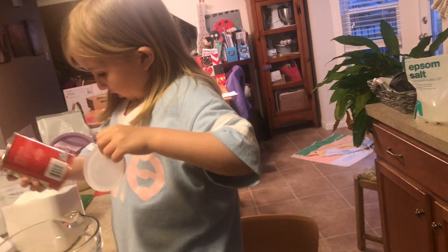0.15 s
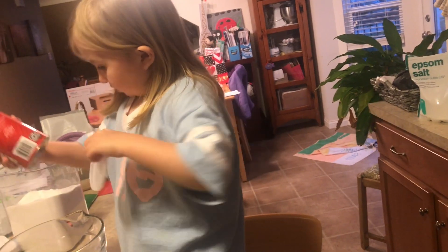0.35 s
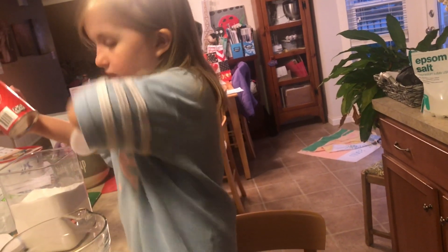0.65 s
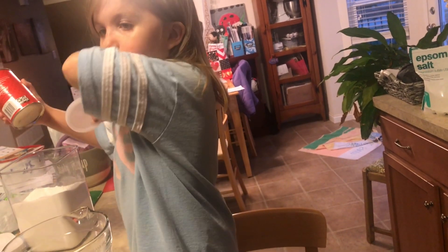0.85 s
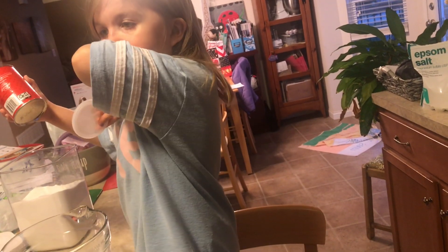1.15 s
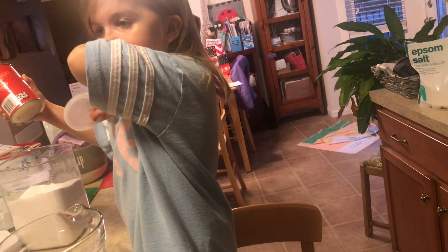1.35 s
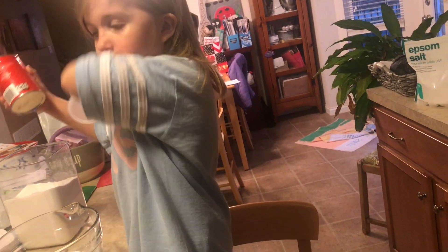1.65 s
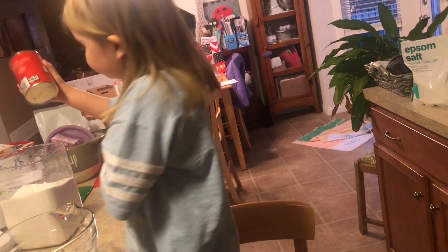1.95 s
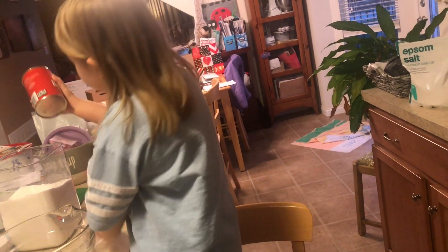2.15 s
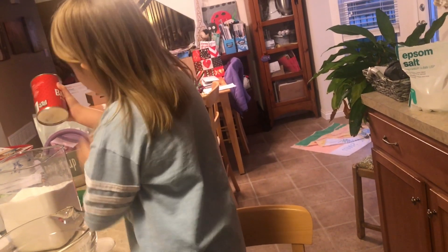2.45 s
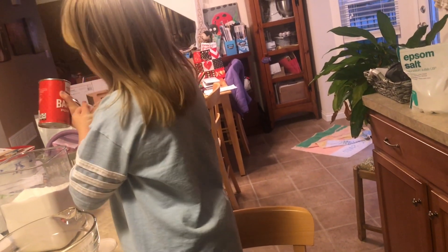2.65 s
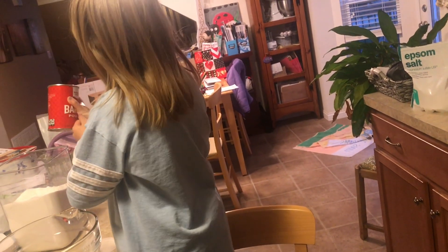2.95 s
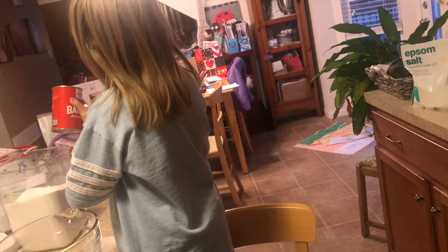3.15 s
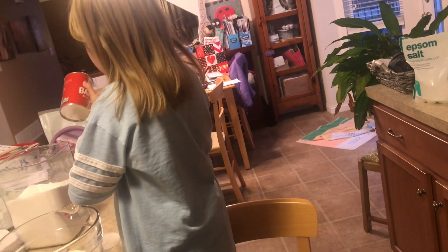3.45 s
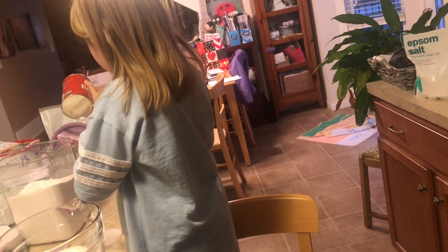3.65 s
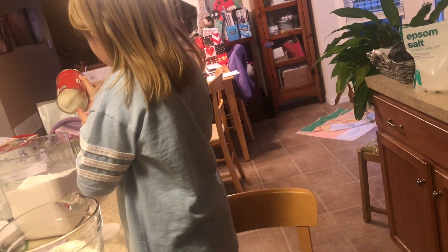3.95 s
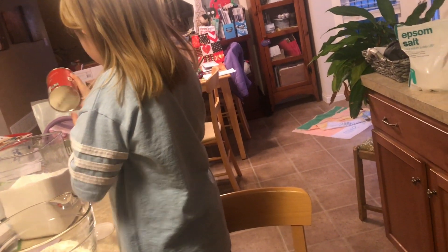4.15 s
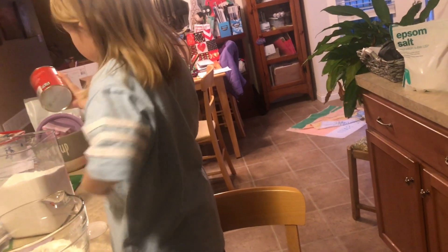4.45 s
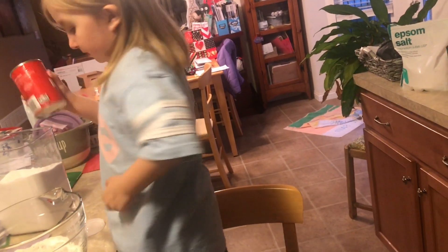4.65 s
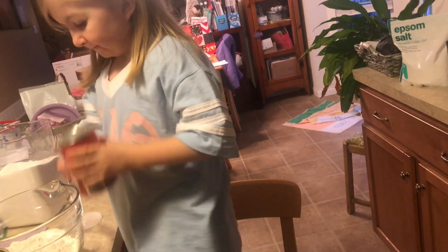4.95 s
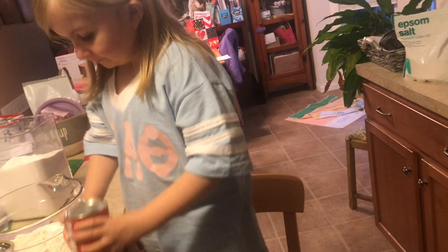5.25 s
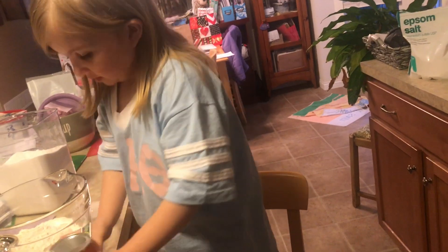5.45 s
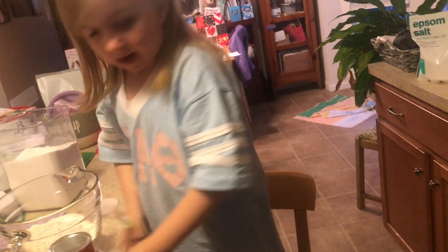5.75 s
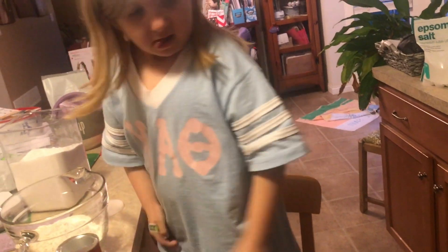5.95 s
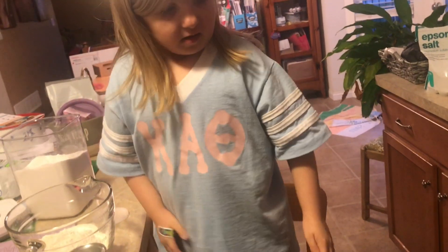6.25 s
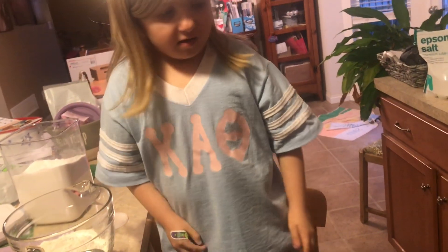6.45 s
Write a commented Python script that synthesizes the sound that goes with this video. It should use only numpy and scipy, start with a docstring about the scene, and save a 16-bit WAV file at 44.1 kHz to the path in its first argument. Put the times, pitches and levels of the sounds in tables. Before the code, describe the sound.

Plastic and metal utensils clack, click and slide as a wooden kitchen drawer is rummaged through, with a few hollow knocks.

```python
"""Plastic and metal utensils clack, tick and slide as a wooden kitchen drawer is rummaged through.
Each clack is a short rough contact that rings the struck piece; sliding is clumped hiss and small taps.
The drawer box knocks hollow in its panel modes, and one metal piece clinks near the end.
A tiled kitchen rings briefly; an appliance hums in the quiet."""
import sys
import numpy as np
from scipy import signal
from scipy.fft import rfft, irfft
from scipy.io import wavfile
from scipy.ndimage import uniform_filter1d

SR = 44100
rng = np.random.default_rng(int(sys.argv[2]) if len(sys.argv) > 2 else 0)


def waveform_to_disk(signal):
    """Save audio, clipped to [-1, 1], as 16-bit WAV at the path in sys.argv[1]."""
    frames = np.transpose(np.atleast_2d(signal))
    scaled = np.clip(frames, -1, 1) * 32767
    samples = np.round(scaled).astype(np.int16)
    wavfile.write(sys.argv[1], SR, samples)


N = 291060

# Utensil blows; ring, plastic, tick and room are trims on level_db:
# start_s, level_db, pitch_hz, ring_db, plastic_db, tick_db, contact_s, room_db
CLACKS = [(0.113, -31, 2740, -23, -8, -11, 0.0026, 4.5), (0.1416, -25.5, 3050, -24, -31, 0.5, 0.0037, 2.5),
          (0.178, -29.5, 2380, -21, -28, -7, 0.0032, 9), (0.2190, -8, 6900, -16, -19, -5.5, 0.0079, -1),
          (0.2551, -22.5, 8800, -5, -39, -6, 0.0034, 12), (0.373, -1.5, 3140, -4, -6, -16.5, 0.0076, -5),
          (0.5378, -30, 3200, -7, -2, -6.5, 0.0043, 13.5), (0.6052, -19, 2200, 1.5, -28, -13, 0.0055, -1.5),
          (0.657, -12.5, 3120, -12, 0.5, -11, 0.0074, 0.5), (0.689, -8, 2360, -24, -4.5, -16, 0.007, -4.5),
          (0.7386, -7, 3200, -20, -4.5, -13, 0.0062, -6.5), (0.8066, -35, 6840, -8, -18, 10, 0.0024, -12),
          (0.818, -26.5, 7000, -2.5, -18, -2, 0.0031, 12), (0.8787, -15.5, 2880, -15, -14, -3.5, 0.0093, 4),
          (0.9233, -19, 4270, -4, -25, -2.5, 0.0042, -1), (1.041, -25.5, 2210, -5, -7, -4, 0.0036, 3),
          (1.084, -16.5, 3380, -2, -8.5, -8, 0.0061, 0.5), (1.154, -23.5, 2770, -5, -14, -8, 0.0082, 9.5),
          (1.2263, -14.5, 7180, -7, -17, -8, 0.005, 0), (1.267, -23.5, 7400, 1, -4, 0.5, 0.0043, 0.5),
          (1.3331, -18.5, 2770, -12, -33, -12.5, 0.0052, -3),
          (1.4619, -23.5, 5800, -7, -11, -6, 0.0066, -3), (1.524, -31, 5800, -2.5, -22, -11, 0.003, 8.5),
          (1.5405, -32.5, 5700, -7, 0.5, -7, 0.008, -2.5), (1.7546, -46, 2320, -26, -8, -21, 0.0047, 15.5),
          (1.8472, -32, 2950, -12, -30, -22, 0.0071, 7.5),
          (2.052, -40.5, 3060, -16, -23.5, -32, 0.0046, 1.5), (2.15, -12, 3020, -11, -8, -23, 0.001, -5),
          (2.212, -21, 2620, -17, -21, -11, 0.001, -6), (2.2167, -10.5, 2760, 3.5, -28, -16.5, 0.0021, -3),
          (2.618, -38.5, 2290, -17, -8.5, -32, 0.0049, 6), (2.7292, -31.5, 2720, -9, -21, -23, 0.0042, 2.5),
          (3.27, -35, 6640, -10, -21, -12, 0.0012, 7.5), (3.3027, -22.5, 2760, -3, -17, -6, 0.001455, 7.5),
          (3.3533, -7, 2850, -12, -2.5, -14, 0.0083, -1.5), (3.354, -12.5, 1410, 21, -30, -30, 0.0018, -19),
          (3.4548, -20.5, 2560, -21, -26, -6, 0.0047, 7),
          (3.4784, -12.5, 4600, -5.5, -27.5, -4, 0.0033, -14),
          (3.5258, -13, 2720, -21, -21, -8.5, 0.0053, 5), (3.5531, -7.5, 2720, -16, -22, -4.5, 0.0035, -2),
          (3.6474, -27, 2550, -3, -20, -18, 0.0019, -10), (3.678, -16, 2600, -14, -26, -18, 0.0084, -2),
          (3.8074, -30.5, 9900, -7, -4, -9, 0.0022, 9), (3.8603, -18, 2930, 2, -16, -10.5, 0.0021, -0.5),
          (3.896, -21.5, 2620, -12, -19, -8, 0.0046, 4), (3.9273, -19, 4280, -7, -3.5, -16, 0.0039, -4),
          (3.9823, -31, 11000, -4, -19, -5, 0.0024, -8), (4.035, -16.5, 5570, -5.5, -12.5, -3.5, 0.0042, 0),
          (4.105, -27.5, 9000, 0.5, -21, -1, 0.0077, -7), (4.181, -32, 6500, 4, -21, -18, 0.0042, 12),
          (4.1961, -23.5, 2210, -9, 2, -18, 0.0056, 2.5), (4.238, -14.5, 3260, -12, -3, -22, 0.0061, -4),
          (4.3021, -18, 7100, 11.5, -19, 2.5, 0.0009, -4), (4.3819, -24, 5450, 3.5, -27, -7, 0.00095, 3.5),
          (4.4103, -17, 2800, -5, -8, -11, 0.006, -9.5), (4.496, -29, 9000, -8, -25, -5, 0.0021, 4),
          (4.5087, -7.5, 2540, -11, 1.5, -17, 0.0084, -8), (4.53, -9.5, 2700, -21, -34, -23, 0.0027, -2),
          (4.544, -15, 6600, 1, -39, -4.5, 0.002, -9), (4.6995, -43, 7000, -6, -23, 0, 0.0021, -14),
          (4.742, -34.5, 6400, -4, -39, -11.5, 0.0027, -2), (4.792, -37, 5930, -3, -12, -15, 0.0015, 2),
          (4.829, -25, 2750, -13, -25, -12, 0.0046, 6), (4.851, -19.5, 5000, -9, -27, -15, 0.0028, -8),
          (4.876, -16, 4450, -9, -39, -24, 0.0028, -2.5), (4.9035, -18, 6470, 2, -30, -10.5, 0.0046, -4),
          (4.9575, -15.5, 6140, -9, -11, -18, 0.0064, -13), (5.018, -25.5, 3950, -4, -8, 2, 0.0048, -3),
          (5.0626, -13, 4650, -7, -19, -48, 0.0066, -6), (5.141, -9, 3080, -30, -21, -10, 0.0039, -0.5),
          (5.216, -26, 2650, -8, -32, -6, 0.0046, 17), (5.2906, -14.5, 9300, -9, -26, -7.5, 0.005, 5.5),
          (5.339, -30, 9000, -8, -30, 6, 0.002, -9), (5.378, -20, 2860, 0, -5, 0, 0.0038, 2),
          (5.4883, -25.5, 5860, 7.5, -37, 2, 0.0034, 5.5), (5.5589, -14, 3500, -9, -16, -5, 0.0024, -0.5),
          (5.569, -11.5, 4060, -5, -20, -13, 0.004, -4.5),
          (5.5918, -10.5, 5540, -15, -12.5, -12, 0.0029, -1), (5.6392, -22, 4330, 8, -14, 10, 0.0031, -1),
          (5.8453, -16.5, 8300, 0, -23, 0, 0.0047, -2.5), (5.905, -34, 12000, 6, -25, 5, 0.0018, -4),
          (6.102, -31.5, 2150, -2, -29, -14, 0.0022, 10.5),
          (6.1362, -24, 6800, -4, -8.5, -13.5, 0.0035, 2.5),
          (6.2139, -32.5, 8800, -10, -20, 0.5, 0.0023, -3), (6.2458, -29, 3100, 1, -21, -8, 0.0046, 8),
          (6.331, -34, 6600, -12, -5, -1.5, 0.0015, 3), (6.434, -29, 4900, -1, -25.5, -1.5, 0.0019, -0.5),
          (6.519, -31, 6000, -11, -25, -10, 0.0031, 4), (6.5473, -24.5, 2820, -9, -24, -17, 0.0046, 0.5)]
# Blows on the drawer: start_s, peak_db, most_excited_hz
KNOCKS = [(0.227, -23, 624), (0.541, -33.5, 565), (0.657, -19.5, 286), (.69, -20.5, 284), (0.849, -30, 357),
          (.918, -27, 586), (0.976, -29, 180), (1.029, -25.5, 533), (1.087, -26, 352), (1.166, -29, 595),
          (1.201, -24, 350), (1.278, -32, 583), (3.356, -6.5, 756), (3.367, -12.5, 890), (3.457, -28, 550),
          (3.553, -20, 810), (3.827, -29, 293), (4.108, -27, 515), (4.509, -24.5, 310), (4.838, -26, 513),
          (5.139, -25.5, 755), (5.418, -10.5, 590), (5.424, -24, 280), (5.449, -20, 850), (5.595, -25, 320),
          (6.133, -27.5, 645), (6.248, -27.5, 565), (6.365, -32.5, 573)]
# Sliding envelopes, one list per bout: time_s, effort_db, drawer_db, rustle_db
SLIDE_BOUTS = [
    [(0.0, -47.5, -65, -73), (0.156, -80, -42.5, -52), (0.326, -39.5, -36, -11), (0.83, -40.5, -44.5, -89),
     (1.158, -45.5, -37, -43), (1.314, -44, -47.5, -53), (1.65, -87, -56.5, -76)],
    [(3.29, -62, -39.5, -88), (3.484, -31.5, -35, -50), (3.862, -48.5, -46, -33), (4.09, -54, -41, -48),
     (4.444, -49, -44.5, -40), (4.626, -53, -50, -61), (4.75, -62, -54, -63)],
    [(4.83, -50, -50, -63), (4.886, -45.5, -45, -62), (5.028, -46.5, -44.5, -45), (5.388, -35.5, -34, -44),
     (5.512, -43, -66, -19), (5.706, -35, -36.5, -18), (5.82, -69, -79, -45)],
    [(5.86, -43, -41, -53), (5.934, -48.5, -42, -31), (6.106, -63, -46, -59), (6.198, -50.5, -41, -26),
     (6.308, -48.5, -42.5, -61), (6.474, -54.5, -45, -52), (6.6, -46, -44, -67)],
]
# Modes of the drawer box, hollow plastic and one metal piece: pitch_hz, relative_db, t60_s
DRAWER_MODES = [(179, -4.5, 0.18), (207.2, -3.5, 0.11), (301, 3, 0.08), (350, 4.5, 0.08), (458.4, 0, 0.06),
                (490, 1.5, 0.072), (565, 9, 0.037), (623.4, -6, 0.22), (655.6, -1, 0.092), (752, -4, 0.12),
                (839, 6.5, 0.029), (996, 2, 0.04), (1113, 6, 0.018), (1380, 8, 0.017), (1535, 0, 0.1)]
PLASTIC_MODES = [(1358, 23.5, 0.0087), (1770, 35, 0.0068)]
CLINK_MODES = [(3150, 0, .01), (3460, 5, .014), (4660, -10, .02), (5960, -2, .02), (8520, 2, .022),
               (11000, -3, .025)]
# Modes of loose metal pieces: pitch_hz
CUTLERY_HZ = [6540, 8210, 8580, 9810, 11000, 12000, 12600, 14400]
# Spectra of the contact crack, bright tick and room air: frequency_hz, relative_db
CRACK_SPECTRUM = [(300, -2.5), (1000, -1), (2000, -3), (3000, 2), (5000, 0), (7000, -4.5), (16000, -18)]
TICK_SPECTRUM = [(3000, -17), (6000, -1), (8500, -1), (10500, -6.5), (12000, -1), (16000, -1.5)]
AIR_SPECTRUM = [(20, -61), (40, -13), (60, -8), (90, -15.5), (140, -20), (200, -15.5), (300, -19),
                (660, -24.5), (900, -32), (3000, -40.5), (5500, -45), (9000, -47.5), (12500, -48.5),
                (16000, -38.5)]
# Tiled room decay: frequency_hz, t60_s
KITCHEN_DECAY = [(150, 0.3), (600, 0.41), (2500, 0.4), (6000, 0.32), (10000, 0.2), (15000, 0.22)]
# Appliance noise bands: centre_hz, width_hz, level_db
HUM_BANDS = [(120, 18, -67.5), (201, 27, -57)]
# Microphone response: frequency_hz, gain_db
MIC_RESPONSE = [(4200, -0.67), (5100, -2), (6200, 1), (9500, 0), (10500, -3), (11500, 0), (16000, -12.5)]


def clacks():
    """Each blow drives the utensils and rings the struck piece. Returns near and room feeds."""
    t = np.arange(SR // 8) / SR
    feeds = np.zeros((2, 4, N + SR))  # near/room, crack/plastic/tick/ring, samples
    dull_hz, soft_below_db, ring_cycles = 5000, -30.5, 30
    lowpass = signal.butter(2, dull_hz, fs=SR)
    for start_s, level_db, pitch_hz, ring_db, plastic_db, tick_db, contact_s, room_db in CLACKS:
        force = contact_force(t, contact_s, room_db)
        tick = gain_of(tick_db) * force
        softness = np.clip((soft_below_db - level_db) / 2.7, 0, 1)  # soft blows lose treble
        force = (1 - softness) * force + softness * signal.lfilter(*lowpass, force)
        t60_s = ring_cycles / pitch_hz
        modes = ringing([(pitch_hz, 0, t60_s), (0.89 * pitch_hz, -1, t60_s / 2)])  # lower mode roughens
        ring = signal.fftconvolve(force, modes[None], axes=1)[:, :len(t)]
        ring *= gain_of([[ring_db], [ring_db - 6]])  # carries less far than the crack
        parts = np.stack([force, gain_of(plastic_db) * force, tick, ring], 1)
        at = round(start_s * SR)
        feeds[:, :, at:at + len(t)] += gain_of([level_db, level_db + room_db])[:, None, None] * parts
    return [utensils(crack, plastic, tick) + ring for crack, plastic, tick, ring in feeds[:, :, :N]]


def contact_force(t, contact_s, room_db, rise_share=0.57, room_rough_share=0.15):
    """Near force: a rough burst with a hard first touch. Room force: mostly one clean pulse."""
    rise = np.minimum(t / (rise_share * contact_s), 1)
    rough = rng.standard_normal(len(t)) * np.exp(-t / contact_s) * rise
    rough[SR // 1500] += 0.12 * np.linalg.norm(rough) * gain_of(-room_db)  # harder for near blows
    rough /= np.linalg.norm(rough)
    pulse = np.arange(len(t)) == round(contact_s * SR)
    smooth = np.sqrt(1 - room_rough_share) * pulse + np.sqrt(room_rough_share) * rough
    return gain_of(11) * np.array([rough, smooth])


def utensils(crack, plastic, tick, cutlery_t60_s=0.014):
    """Three forces sound a broad crack, hollow plastic and a bright tick with ringing cutlery."""
    cutlery = gain_of(-10) * ringing([(hz, 0, cutlery_t60_s) for hz in CUTLERY_HZ])
    paths = [(crack, colour(CRACK_SPECTRUM)),
             (plastic, gain_of(2.5) * ringing(PLASTIC_MODES)),
             (tick, gain_of(9) * (colour(TICK_SPECTRUM, size=len(cutlery)) + cutlery))]
    return sum(signal.oaconvolve(force, taps)[:N] for force, taps in paths)


def drawer_knocks(contact_s=0.00012, roughness=0.3, spread_octaves=1.3):
    """The place of a blow picks which drawer modes ring; a short rough contact smears the start."""
    out, t = np.zeros(N + SR), np.arange(SR // 50) / SR
    mode_hz = np.array(DRAWER_MODES)[:, :1]
    for start_s, peak_db, most_excited_hz in KNOCKS:
        weights = np.exp(-(np.log2(mode_hz / most_excited_hz) / spread_octaves) ** 2)
        force = (1 + roughness * rng.standard_normal(len(t))) * np.exp(-t / contact_s)
        knock = np.convolve(ringing(DRAWER_MODES, weights), force)
        out[round(start_s * SR):][:len(knock)] += gain_of(peak_db) * knock / abs(knock).max()
    return out[:N]


def clink(start_s=5.8462, contact_s=0.003, gain_db=-16):
    """One struck metal piece rings in several bright modes."""
    t = np.arange(N) / SR - start_s
    force = rng.standard_normal(N) * (t > 0) * np.exp(-abs(t) / contact_s)
    return gain_of(gain_db) * signal.oaconvolve(force, ringing(CLINK_MODES))[:N]


def sliding(still_db=-90.0):
    """Bouts of clumped friction hiss and small taps drive the utensils and the drawer box."""
    t, levels_db = np.arange(N) / SR, np.full((3, N), still_db)
    for bout in SLIDE_BOUTS:
        time_s, *curves_db = np.transpose(bout)
        bout_db = [np.interp(t, time_s, curve, still_db, still_db) for curve in curves_db]
        levels_db = np.maximum(levels_db, bout_db)
    effort_db, drawer_db, rustle_db = uniform_filter1d(levels_db, SR // 200)
    flutter = unit_rms(uniform_filter1d(rng.standard_normal((4, N)), 300))
    clumps_db = np.c_[[4, 3.5, 4.5, 2.2]] * flutter
    friction = rng.standard_normal((4, N)) + 1.1 * small_taps()
    crack, plastic, tick, wood = unit_rms(gain_of(clumps_db) * friction)
    tick = unit_rms(tick + crackle())
    box = signal.oaconvolve(wood * gain_of(drawer_db), ringing(DRAWER_MODES))[:N]
    return box + utensils(crack * gain_of(effort_db), plastic * gain_of(effort_db - 9.5),
                          tick * gain_of(rustle_db - 26.5))


def small_taps(rate_per_s=900, pieces=24):
    """Small pieces tap: short pings of many pitches."""
    hits = uneven_impulses(rate_per_s, spread_db=3.8)
    struck = rng.integers(0, pieces, N)
    out, t = np.zeros(N), np.arange(SR // 40) / SR
    for piece, hz in enumerate(np.geomspace(2200, 14000, pieces)):
        ping = np.sin(2 * np.pi * hz * t) * np.exp(-t * hz / 10) * np.sqrt(hz)
        out += signal.oaconvolve(hits * (struck == piece), ping)[:N]
    return unit_rms(out)


def crackle(rate_per_s=70):
    """Separate dry snaps, each a fast-dying noise burst."""
    envelope = signal.lfilter([1], [1, -0.97], uneven_impulses(rate_per_s, spread_db=4))
    return unit_rms(envelope * rng.standard_normal(N))


def kitchen_reverb(x, places=3, move_hz=1.7):
    """Sparse reflections, each band dying at its own rate; the hand moves between places."""
    taps = np.zeros((places, SR))
    at = np.arange(160, SR - 20, 20) + rng.integers(0, 20, (places, (SR - 161) // 20))
    np.put_along_axis(taps, at, rng.choice([-1., 1.], at.shape), 1)
    hz, t, bands = signal.stft(taps, SR, nperseg=256)
    decay = gain_of(-60 * t / curve_at(KITCHEN_DECAY, hz)[:, None])
    tails = signal.istft(bands * decay, SR, nperseg=256)[1]
    phase = 2 * np.pi * (np.arange(N) / SR * move_hz + np.arange(places)[:, None] / places)
    weights = np.sqrt(2 / places) * np.cos(phase)  # squares sum to 1
    return signal.fftconvolve(x * weights, tails / np.linalg.norm(tails[0]), axes=1).sum(0)[:N]


def appliance_hum():
    """Narrow noise bands make a wavering hum."""
    hz = np.fft.rfftfreq(N, 1 / SR)
    return sum(gain_of(level_db) * shaped_noise(1 / (1 + (2 * (hz - centre_hz) / width_hz) ** 2))
               for centre_hz, width_hz, level_db in HUM_BANDS)


def room_air(level_db=-54.5):
    """Steady, mostly low noise."""
    spectrum_db = curve_at(AIR_SPECTRUM, np.fft.rfftfreq(N, 1 / SR))
    return gain_of(level_db) * shaped_noise(gain_of(spectrum_db))


def ringing(modes, weights=1):
    """Dying sines of a struck body, neighbours of opposite sign, energy 1."""
    hz, db, t60_s = np.transpose(modes)[:, :, None]
    t = np.arange(SR // 5) / SR
    sign = (-1) ** np.arange(len(hz))[:, None]
    taps = (sign * weights * gain_of(db - 60 * t / t60_s) * np.sin(2 * np.pi * hz * t)).sum(0)
    return taps / np.linalg.norm(taps)


def colour(spectrum, size=512):
    """Minimum-phase filter with the given spectrum, energy 1."""
    hz = abs(np.fft.fftfreq(4 * size, 1 / SR))
    log_gain = np.log(gain_of(curve_at(spectrum, hz)))
    taps = np.fft.ifft(np.exp(log_gain - 1j * signal.hilbert(log_gain).imag)).real[:size]
    return taps / np.linalg.norm(taps)


def uneven_impulses(rate_per_s, spread_db):
    sizes = gain_of(spread_db * np.minimum(rng.exponential(1, N), 3))
    return sizes * (rng.random(N) < rate_per_s / SR)


def shaped_noise(gain):
    return unit_rms(irfft(rfft(rng.standard_normal(N)) * gain, N))


def curve_at(points, hz):
    point_hz, values = np.transpose(points)
    return np.interp(np.log(hz + 1), np.log(point_hz + 1), values)


def unit_rms(x):
    return x / np.sqrt(np.mean(x ** 2) + 1e-20)


def gain_of(db):
    return 10 ** (np.asarray(db) / 20)


def scene(low_cut_hz=135):
    """Rummaging and its reverb over hum and air; a low cut keeps rumble out of the rummaging."""
    near, room_feed = clacks()
    blows, slides = drawer_knocks() + clink(), sliding()
    reverb = kitchen_reverb(room_feed + gain_of(-2) * blows + gain_of(-8.5) * slides)
    highpass = signal.butter(4, low_cut_hz, "high", fs=SR, output="sos")
    rummaging = signal.sosfilt(highpass, near + blows + slides + reverb)
    return (rummaging + appliance_hum() + room_air())[None]


def record(dry, band_limit_hz=15900):
    """A small microphone dips and peaks in the treble; then the band limit."""
    response = gain_of(curve_at(MIC_RESPONSE, np.fft.rfftfreq(N, 1 / SR)))
    lowpass = signal.firwin(511, band_limit_hz, window=("kaiser", 9), fs=SR)
    return signal.oaconvolve(irfft(rfft(dry) * response, N), lowpass[None], "same")


dry = scene()
out = record(dry)
waveform_to_disk(out)
```